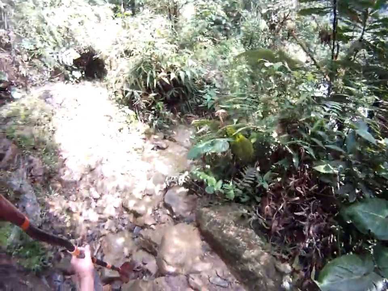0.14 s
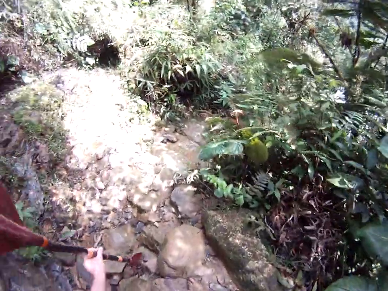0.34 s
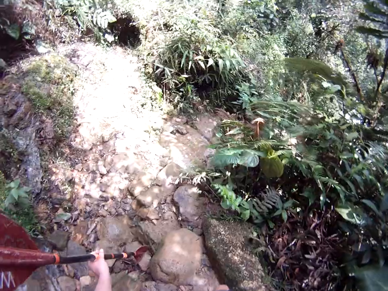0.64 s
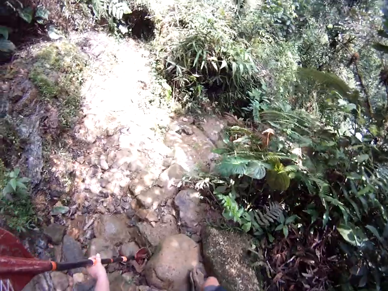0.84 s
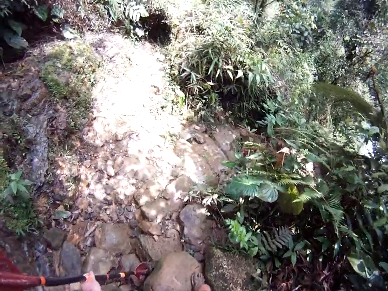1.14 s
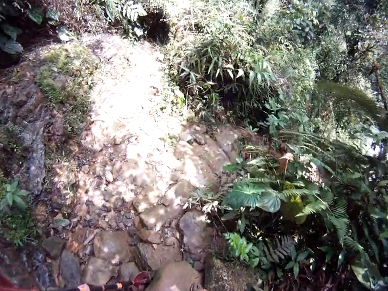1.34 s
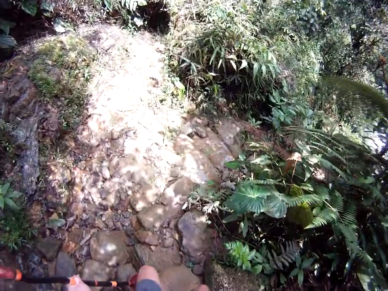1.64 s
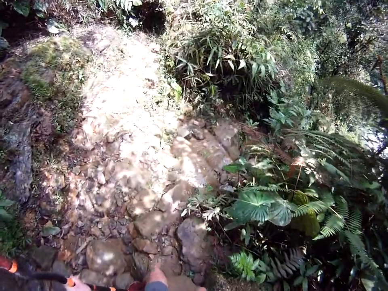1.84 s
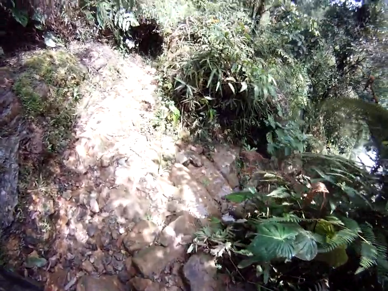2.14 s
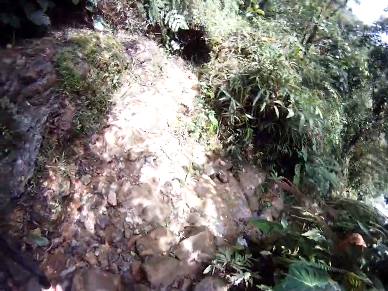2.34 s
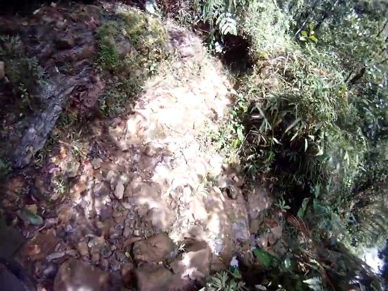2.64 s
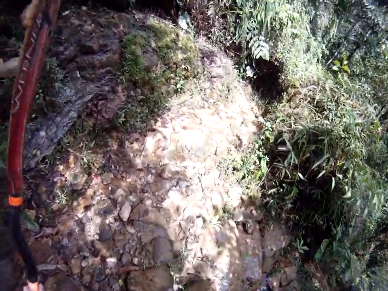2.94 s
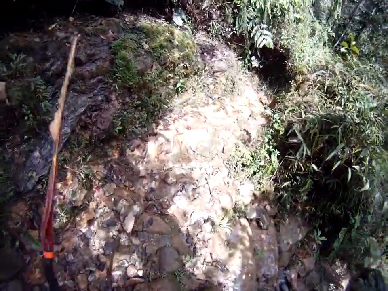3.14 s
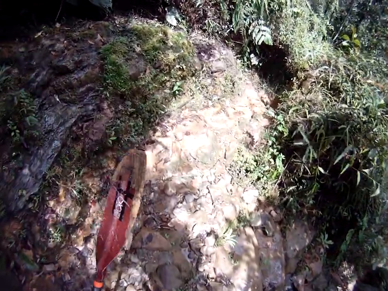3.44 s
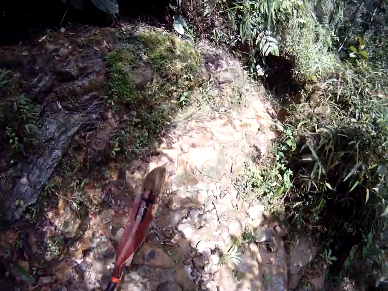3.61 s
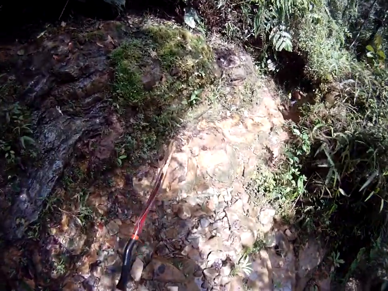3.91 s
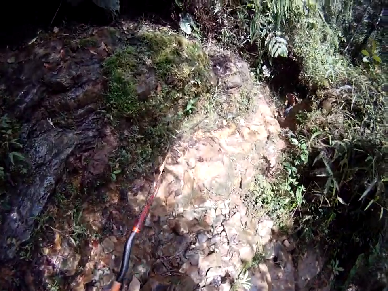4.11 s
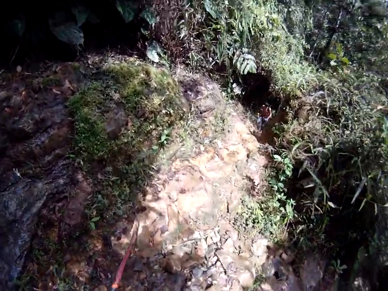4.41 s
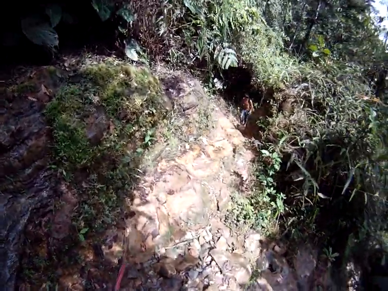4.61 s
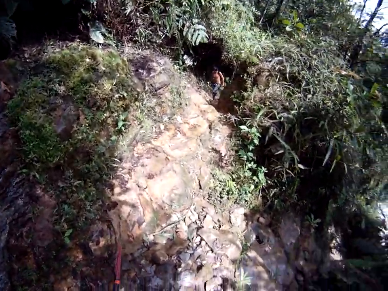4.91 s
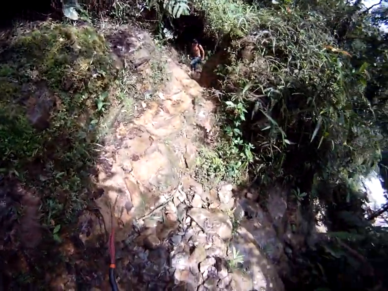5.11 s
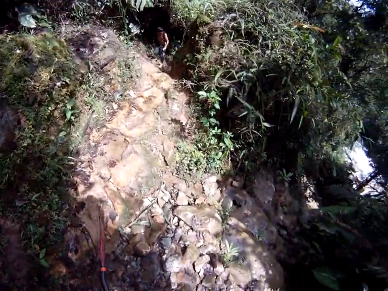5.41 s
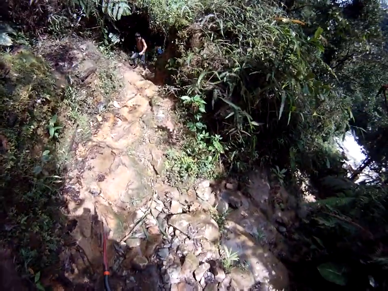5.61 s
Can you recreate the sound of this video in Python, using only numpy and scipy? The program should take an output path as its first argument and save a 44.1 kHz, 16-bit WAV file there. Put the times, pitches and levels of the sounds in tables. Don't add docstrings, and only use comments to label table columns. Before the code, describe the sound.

A walking pole cracks sharply against stone with a heavy thump, then clicks and scrapes, over faint steady stream hiss and muffled camera-housing rumble.

```python
import sys
import numpy as np
from scipy import signal
from scipy.fft import rfft, irfft, next_fast_len
from scipy.io import wavfile
from scipy.ndimage import uniform_filter1d, map_coordinates

SR = 44100
rng = np.random.default_rng(int(sys.argv[2]) if len(sys.argv) > 2 else 0)


def waveform_to_disk(signal):
    frames = np.transpose(np.atleast_2d(signal))
    scaled = np.clip(frames, -1, 1) * 32767
    samples = np.round(scaled).astype(np.int16)
    wavfile.write(sys.argv[1], SR, samples)


def how_loud(loudness_db):
    steps = np.asarray(loudness_db, float) / 20
    return 10 ** steps


N = 253795
T = np.arange(N) / SR
TAP_WIDTH = 0.39

# time_s, peak_db, length_s
SHIFTS = [(0.03, -48.5, 0.17), (.4, -45, 0.13), (.68, -47, .08), (1.12, -46.5, 0.23), (1.36, -52, 0.24),
          (1.55, -49, 0.15), (1.84, -50, .2), (2.09, -49, .1), (2.33, -43.5, 0.37), (2.75, -51.5, .1),
          (2.98, -44, 0.14), (3.12, -42, .2), (3.32, -44, 0.24), (3.58, -45.5, 0.14), (3.78, -45, 0.24),
          (4.02, -47.5, 0.094), (4.36, -50.5, 0.24), (4.66, -53, 0.078), (4.89, -54, 0.054),
          (5.11, -47, 0.056), (5.45, -54, .15), (5.6, -50.5, .12)]


def unit(x):
    return x / np.sqrt(np.mean(x ** 2) + 1e-20)


def along(points, hz):
    f, v = np.transpose(points)
    return np.interp(np.log(hz + 1), np.log(f + 1), v)


def curves(rows):
    s, *cols = np.transpose(rows)
    return [np.interp(T, s, c) for c in cols]


def wobble(rate_hz):
    knots = rng.standard_normal(int(N * rate_hz / SR) + 4)
    return map_coordinates(knots, [T * rate_hz])


def filtered(x, response):
    m = next_fast_len(len(x) + 8192)
    spectrum = rfft(x, m) * response(np.fft.rfftfreq(m, 1 / SR))
    return irfft(spectrum, m)[:len(x)]


def ring(f, hz, width_hz):
    return 1j * f * width_hz / (hz * hz - f * f + 1j * f * width_hz)


def noise(colour):
    return unit(filtered(rng.standard_normal(N), lambda f: how_loud(along(colour, f))))


def pressed(x, span_s):
    power = uniform_filter1d(x ** 2, round(span_s * SR))
    power = uniform_filter1d(power, round(span_s * SR / 2))
    return unit(x / np.sqrt(np.abs(power) + 1e-12))


def lumps(rows):
    return sum(how_loud(db) ** 2 * np.exp(-8 * ((T - s) / length_s) ** 2) for s, db, length_s in rows)


def strike(contacts):
    out = np.zeros(N + SR)
    t = np.arange(SR // 10) / SR
    for s, db, hz, width_hz, t60_s in contacts:
        crack = rng.standard_normal(len(t)) * how_loud(-60 * t / t60_s)
        crack *= 1 - np.exp(-t / 0.00019)
        crack[:SR // 1500] *= 2
        tick = filtered(crack, lambda f: ring(f, hz, width_hz * 1.4) ** 2)
        out[round(s * SR):][:len(t)] += how_loud(db) * tick / np.abs(tick).max()
    return out[:N]


def slab_blow():
    blow_s, blow_db = 2.3143, -19.5
    touch_lead_s, touch_db = 0.004, -17
    # centre_hz, width_hz, level_db, t60_s
    slab = [(197, 150, -17.5, 0.15), (600, 600, -12, .03), (1150, 510, -9.5, 0.0064),
            (1450, 450, -4, 0.0037), (3700, 500, -12, .008), (4600, 1200, -2, .006), (5400, 500, -18, .004)]
    touch = [(blow_s - touch_lead_s, blow_db + touch_db, hz, hz, 0.02) for hz in (1200, 4200)]
    blow = [(blow_s, blow_db + db, hz, width_hz, t60_s) for hz, width_hz, db, t60_s in slab]
    return strike(touch + blow)


def tip_taps():
    # time_s, peak_db, centre_hz, t60_s
    taps = [(2.2135, -39, 1150, .015), (2.213, -42.5, 500, .03), (2.330, -44, 700, .03),
            (2.3893, -41, 4600, .008), (2.3893, -39, 5400, .008), (2.391, -41, 1800, .012),
            (2.398, -44, 3600, 0.007), (3.0867, -37, 4700, .008), (3.087, -40.5, 1300, .06),
            (3.1172, -38, 5400, 0.009), (3.1188, -40, 3700, .008), (3.126, -44.5, 3600, .04),
            (3.129, -45, 2000, 0.022), (3.131, -47, 774, 0.055), (3.138, -48, 3320, .03),
            (3.289, -46, 1000, .012), (3.349, -41, 1050, .01), (3.352, -48, 4000, .02),
            (3.378, -42, 800, .02)]
    return strike([(s, db, hz, TAP_WIDTH * hz, t60_s) for s, db, hz, t60_s in taps])


def boot_grit():
    grain_hz, t60_s = 3700, 0.015
    # time_s, peak_db
    grains = [(.1685, -54), (.440, -53), (1.035, -50), (1.106, -45.5), (1.882, -57), (2.646, -47),
              (2.915, -46), (3.536, -56), (4.055, -53), (4.679, -53), (4.992, -52), (5.345, -49),
              (5.536, -53), (5.689, -54)]
    return strike([(s, db, grain_hz, TAP_WIDTH * grain_hz, t60_s) for s, db in grains])


def scrapes():
    bite_s, fade_db = 0.0017, -8
    # start_s, length_s, level_db, shaft_share (0-1)
    strokes = [(3.289, 0.011, -48, .7), (3.297, .026, -44, 0.6), (3.349, 0.015, -46.5, 0.4),
               (3.361, .024, -42, .08)]
    # freq_hz, level_db (per Hz)
    grit_colour = [(250, -20), (600, -1), (900, 0), (1500, -2), (2200, -4), (3000, -13), (4000, -10),
                   (5500, -24)]
    # centre_hz, width_hz, level_db
    shaft_modes = [(2090, 240, 3), (3920, 240, -11), (890, 250, 5), (1340, 220, 5)]

    def shaft_response(f):
        return sum(how_loud(level_db) * ring(f, hz, width_hz) ** 2 for hz, width_hz, level_db in shaft_modes)

    out = np.zeros(N)
    for s, length_s, db, share in strokes:
        share = np.clip(share, 0, 1)
        during = (T > s) & (T < s + length_s)
        t = T[during] - s
        stroke = how_loud(db + fade_db * t / length_s)
        stroke *= np.clip(np.minimum(t, length_s - t) / bite_s, 0, 1)
        grains = rng.standard_normal(during.sum()) * how_loud(3.2 * wobble(700)[during])
        grit = pressed(filtered(grains, lambda f: how_loud(along(grit_colour, f))), span_s=0.005)
        shaft = pressed(filtered(grains, shaft_response), span_s=0.006)
        out[during] += stroke * (np.sqrt(1 - share) * grit + np.sqrt(share) * shaft)
    return out


def jolts():
    # mid_crossing_s, peak_db, swing_hz, direction (signed factor)
    swings = [(1.119, -36.5, 41, 1), (1.155, -36.5, 30, 0.94), (2.248, -36, 73, 1), (2.311, -28, 75, -1),
              (2.326, -8.5, 58, 0.92), (2.35, -25.5, 74, 1), (2.369, -23, 34, 1), (2.426, -28.5, 15, 1),
              (3.086, -21.5, 38, 0.97), (3.103, -47, 60, -0.64), (3.144, -29, 15, 0.92),
              (3.18, -39, 22, -1), (3.28, -41, 29, -0.68), (3.31, -47, 21, 1), (3.551, -33.5, 38, 0.75),
              (3.623, -30.5, 33, 0.75), (3.69, -34, 33, 0.74), (3.777, -30, 14, 0.96),
              (4.511, -41, 65, -1.06), (4.897, -43, 26, 1), (5.425, -41, 24, 1), (5.467, -42, 25, 1)]
    out = np.zeros(N)
    for s, db, hz, direction in swings:
        u = 4 * hz * (T - s)
        out -= direction * how_loud(db + 2.0) * u * np.exp(-u * u / 2)
    return out


def knocks():
    # time_s, peak_db, pitch_hz, length_s
    rings = [(2.215, -45, 880, 0.0058), (3.298, -43, 2094, 0.0074), (3.306, -41, 2066, 0.013),
             (2.376, -53, 290, 0.068), (2.558, -45.5, 251.5, 0.032), (2.873, -52, 280, 0.04),
             (2.885, -54, 163.5, .04), (2.3195, -39, 3900, .01), (2.333, -41, 1120, .007),
             (2.215, -44, 1180, .006), (2.391, -38, 3370, .0045), (5.018, -47, 88, .05),
             (2.3155, -30, 4650, .006), (3.1189, -29, 3300, .0022), (3.2905, -42, 2060, .007),
             (3.296, -53, 3850, 0.02), (3.353, -52, 4000, .01), (3.365, -55, 3950, .016)]
    out = np.zeros(N)
    for s, db, hz, length_s in rings:
        out += how_loud(db) * np.sin(2 * np.pi * hz * T) * np.exp(-8 * ((T - s) / length_s) ** 2)
    return out


def body_sway():
    sway_db = -55.5
    # freq_hz, level_db (per Hz)
    colour = [(6, -11.5), (14, 9), (24, -2.5), (36, -2.5), (55, -20.5), (90, -48)]
    level = np.sqrt(how_loud(sway_db) ** 2 + lumps(SHIFTS))
    return level * pressed(noise(colour), span_s=0.18)


def strap_rub():
    rest_db, under_sway_db = -69, -16.5
    # freq_hz, level_db (per Hz)
    colour = [(35, -63), (55, 1.5), (85, 2), (120, -6.5), (150, -24), (220, -53)]
    # time_s, peak_db, length_s
    rubs = [(0.03, -55, 0.14), (1.18, -60, 0.16), (1.5, -59, 0.07), (1.71, -56, 0.068), (2.03, -57, 0.13),
            (2.32, -51.5, .3), (2.65, -59.5, .2), (3.09, -52, .15), (3.38, -61, .1), (3.68, -59, 0.091),
            (3.88, -60, 0.11), (4.33, -53.5, 0.37), (4.72, -63, 0.11), (5.02, -59, .08), (5.73, -62, 0.11)]
    power = how_loud(rest_db) ** 2 + how_loud(under_sway_db) ** 2 * lumps(SHIFTS) + lumps(rubs)
    return np.sqrt(power) * pressed(noise(colour), span_s=0.095)


def cloth():
    start_db, slope_db_per_s, under_sway_db = -64, -0.63, -24
    # freq_hz, level_db (per Hz)
    colour = [(110, -31), (170, -4.5), (250, -0.5), (330, -1), (420, -12.5), (600, -52)]
    power = how_loud(start_db + slope_db_per_s * T) ** 2 + how_loud(under_sway_db) ** 2 * lumps(SHIFTS)
    return np.sqrt(power) * how_loud(0.6 * wobble(2.525)) * noise(colour)


def strap_creak():
    # time_s, slip_rate_hz, level_db
    slip_curve = [(4.14, 128, -62), (4.19, 126, -53.5), (4.25, 122, -50.5), (4.29, 89, -50),
                  (4.33, 70, -50.5), (4.37, 86, -48.5), (4.405, 106, -46), (4.43, 95, -57), (4.50, 83, -68)]
    rate_hz, db = curves(slip_curve)
    turns = np.cumsum(rate_hz * (1 + 0.08 * wobble(30))) / SR
    slips = np.diff(np.floor(turns), prepend=0) * how_loud(2.5 * wobble(60))
    wall = filtered(slips, lambda f: ring(f, 98, 100) ** 2 + how_loud(-8.0) * ring(f, 243, 105) ** 2)
    return unit(wall) * how_loud(db) * (T > slip_curve[0][0]) * (T < slip_curve[-1][0])


def stream():
    low_db, high_db = -55.5, -62
    # time_s, level_db
    flow = [(0, -0.68), (2.3, 0), (3.2, 0.67), (5.75, 0.21)]
    # freq_hz, level_db (per Hz)
    low_colour = [(60, -24), (130, 0.5), (250, -5.5), (400, -2), (600, -2), (1200, -1), (2200, -2.5),
                  (2450, -8), (2900, -69)]
    # freq_hz, level_db (per Hz)
    high_colour = [(2000, -63), (2400, -2), (3000, -2.5), (4000, -3.5), (5000, -7), (5500, -3.5),
                   (6100, -13)]
    swell_db = curves(flow)[0]
    hiss = how_loud(low_db + swell_db) * noise(low_colour) + how_loud(high_db + swell_db) * noise(high_colour)
    z = signal.stft(hiss, nperseg=512)[2]
    patches = uniform_filter1d(rng.standard_normal(z.shape), size=3, axis=0)
    patches = uniform_filter1d(patches, size=20, axis=1)
    patchy = signal.istft(z * how_loud(1.02 * unit(patches)), nperseg=512)[1][:N]
    return patchy * how_loud(0.09 * wobble(12))


def cavities(f):
    # centre_hz, width_hz, level_db
    housing = [(863, 110, 3.5), (1160, 17, 2), (1300, 140, -2.5), (1566, 112, 4), (1777, 53, 4.5),
               (1830, 150, -1.5), (2095, 87, 7), (2393, 31, -7.5), (2690, 98, 8.5), (2860, 66, -2.5),
               (3225, 248, 9), (3915, 84, 4), (4980, 380, 5)]
    gain_db = sum(db * np.exp(-0.5 * ((f - hz) / width_hz) ** 2) for hz, width_hz, db in housing)
    log_gain = np.log(how_loud(gain_db))
    mirrored = np.r_[log_gain, log_gain[-2:0:-1]]
    return np.exp(np.conj(signal.hilbert(mirrored))[:len(f)])


def scene():
    airborne = slab_blow() + tip_taps() + boot_grit() + stream()
    handling = jolts() + knocks() + body_sway() + strap_rub() + cloth()
    return (filtered(airborne, cavities) + scrapes() + handling + strap_creak())[None]


def top_cut(x):
    return signal.sosfilt(signal.butter(12, 15780, fs=SR, output="sos"), x)


def record(dry):
    # freq_hz, gain_db
    input_db = [(5, -21), (12, 1.5), (5000, -3), (5350, -9.5), (5700, -13.5), (6000, -40), (6400, -50)]
    output_db = [(15300, 0), (15380, -26), (16000, -45)]
    mic = filtered(dry[0], lambda f: how_loud(along(input_db, f)))
    padded = np.pad(mic, (0, -N % 147 + 147))
    slow = signal.resample(padded, (N // 147 + 2) * 40)
    slow += how_loud(-76) * rng.standard_normal(len(slow))
    held = signal.resample_poly(np.repeat(slow, 4), 147, 160)[1:N + 1]
    held = filtered(held, lambda f: how_loud(along(output_db, f)))
    return top_cut(held[None])


dry = scene()
out = record(dry)
waveform_to_disk(out)
```